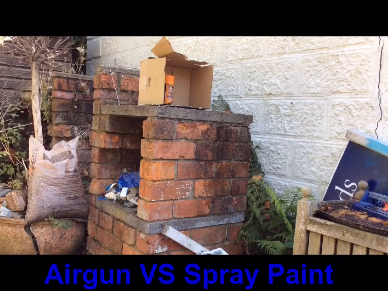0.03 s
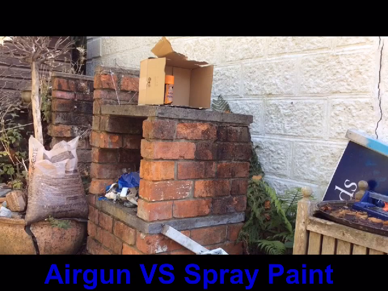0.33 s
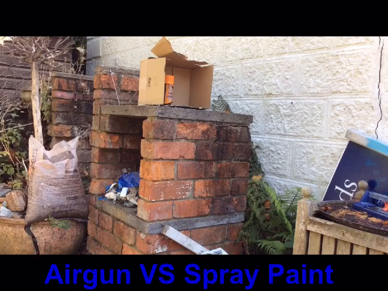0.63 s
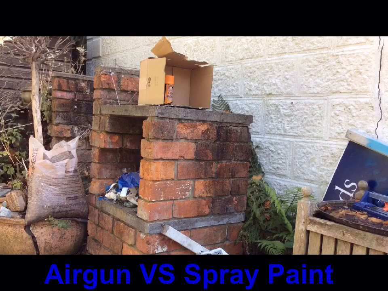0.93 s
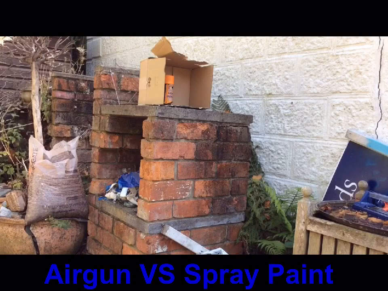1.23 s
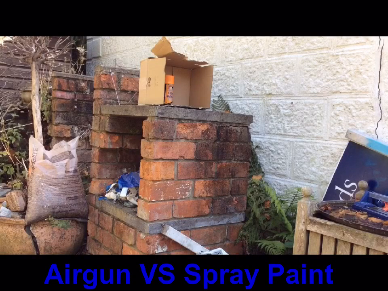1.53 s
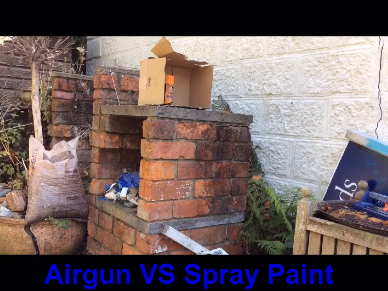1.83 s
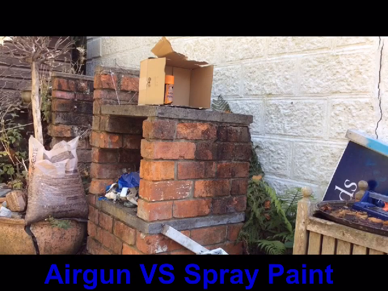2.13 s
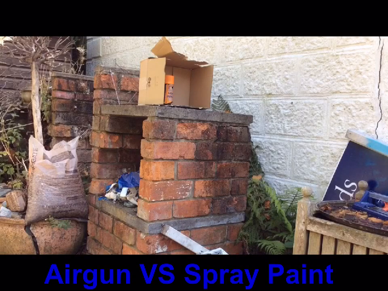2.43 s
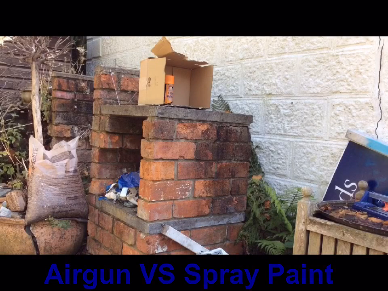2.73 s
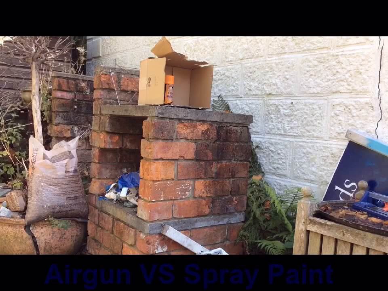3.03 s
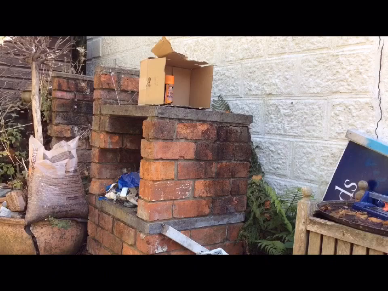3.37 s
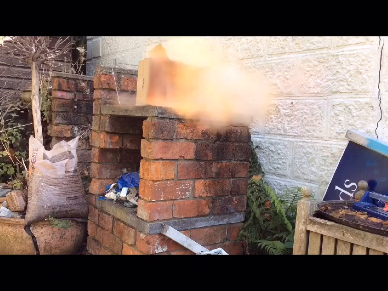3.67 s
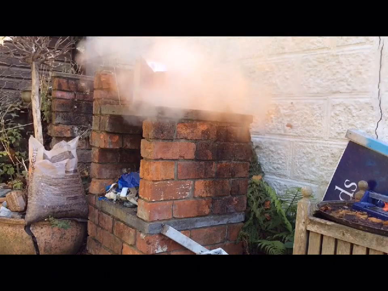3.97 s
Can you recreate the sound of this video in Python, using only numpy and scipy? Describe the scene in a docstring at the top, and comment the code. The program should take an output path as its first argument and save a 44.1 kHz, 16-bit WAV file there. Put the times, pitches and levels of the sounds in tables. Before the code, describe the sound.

A spray can explodes in a quiet yard. Faint distant traffic and a few soft bumps come first, then a sudden, very loud crack, a hissing rush of gas and a fiery roar, with a short echo off nearby walls.

```python
"""Distant traffic fades in a quiet yard, with a few soft bumps. Near the end a spray can ruptures inside
a cardboard box on a brick barbecue. The shell tears and cracks three times, the propellant rushes out
and catches fire, the torn steel rings and the hollow of the box booms under the fireball.
Brick walls close by answer with a short tail."""
import sys
import numpy as np
from scipy import signal
from scipy.fft import rfft, irfft, next_fast_len
from scipy.io import wavfile
from scipy.ndimage import map_coordinates

SR = 44100
rng = np.random.default_rng(int(sys.argv[2]) if len(sys.argv) > 2 else 0)


def generate_wav(sig):
    """Save sig (samples, or channels by samples) to the path in sys.argv[1] as 16-bit PCM at SR."""
    pcm = np.round(np.clip(np.atleast_2d(sig).T, -1, 1) * 32767).astype(np.int16)
    wavfile.write(sys.argv[1], SR, pcm)


N = 176400
T = np.arange(N) / SR
TEAR_S, JET_S, FIRE_S = 3.6845, 3.6917, 3.72  # the shell gives, the gas escapes, the cloud ignites


def rupture():
    """The steel shell tears, then cracks three times with a heavy body and a bright edge."""
    # cracks of the bursting shell: t/s, body level/dB, edge level/dB, t60/s
    cracks = [(3.6917, -11, -24, 0.089), (3.704, -14, -23, 0.13), (3.7168, -9.5, -9.5, 0.039)]
    # spectrum of the body: f/Hz, level/dB
    body_colour = [(25, -19), (55, -15), (95, -2), (150, -2), (200, -2.5), (255, -20), (340, -4.5),
                   (500, -1), (680, -6), (900, -4), (1350, 1.5), (1750, -8), (2450, -3.5), (4000, -20)]
    # spectrum of the edge: f/Hz, level/dB
    edge_colour = [(1500, -35), (3500, -12), (8000, 10.5), (12000, 6), (15500, 8)]
    tear = strike(TEAR_S, rise=0.0011, t60=0.2)
    body, edge = amp(-25) * tear, amp(-28.5) * tear
    for start, body_db, edge_db, t60 in cracks:
        blow = strike(start, rise=0.00027, t60=t60)
        body = np.hypot(body, amp(body_db) * blow)  # the blows add in power
        edge = np.hypot(edge, amp(edge_db) * blow)
    return body * noise(body_colour) + edge * noise(edge_colour)


def jet():
    """Propellant rushes out with a sputter of droplets, brightens as the spray thins, and runs dry."""
    # contour of the outflow: t/s, relative level/dB
    outflow = [(3.692, -20.5), (3.716, -20.5), (3.742, -14.5), (3.765, -14.5), (3.788, -13.5),
               (3.815, -14.5), (3.835, -19.5), (3.865, -19.5), (3.895, -24), (3.94, -25.5), (3.965, -35),
               (4.0, -52)]
    # spectrum while liquid still sprays: f/Hz, level/dB
    spray_colour = [(1500, -2.5), (2400, 1), (3400, -4.5), (4400, -0.5), (6000, -3), (8000, 0), (11000, -7),
                    (13500, -8), (15500, -17)]
    # spectrum of gas alone: f/Hz, level/dB
    gas_colour = [(1500, -9), (2100, -10), (3000, 1), (4000, -2.5), (4900, -0.5), (6100, -3), (7500, 2),
                  (9500, -1), (12000, -2.5), (15500, -13.5)]
    thins_s, crossfade_s = 3.775, 0.0049
    gas_share = (1 + np.tanh((T - thins_s) / crossfade_s)) / 2
    rush = np.sqrt(1 - gas_share) * noise(spray_colour) + np.sqrt(gas_share) * noise(gas_colour)
    sputter = amp(-8) * unit(noise(gas_colour) * amp(5.5 * wobble(rate=1200)))
    level_db = curve(outflow) - 0.71 + 1.2 * wobble(rate=250)
    return (rush + sputter) * ramp(JET_S, length=0.0018) * amp(level_db)


def fireball():
    """The cloud ignites: a fluttering roar that settles to a steady burn, flares and a low flame."""
    # spectrum of the roar: f/Hz, level/dB
    roar_colour = [(200, -14), (450, 3.5), (580, -9.5), (820, 2.5), (1000, -1.5), (1450, -0.5),
                   (1700, -4.5), (2500, -5.5), (4000, -15)]
    # flares within the fireball: t/s, level/dB, f/Hz, width/Hz
    flare_ups = [(3.756, -20, 420, 500), (3.765, -13, 1170, 300), (3.856, -22, 1500, 110)]
    # spectrum of the low flame: f/Hz, level/dB
    flame_colour = [(25, -42), (70, 1), (110, -12), (190, -9.5), (300, -20)]
    attack_s = 0.0036
    flash = amp(-25.5) * strike(FIRE_S, rise=attack_s, t60=1.39)
    swell = amp(-34.5) * ramp(3.94, length=0.019)  # the flame spreads as the jet runs dry
    roar = noise(roar_colour) * np.hypot(flash, swell) * amp(2 * wobble(rate=130))
    flares = sum(amp(db) * strike(start, rise=0.0019, t60=0.058) * resonating([(hz, width, 0)])
                 for start, db, hz, width in flare_ups)
    flame = amp(-46.5) * noise(flame_colour) * ramp(FIRE_S, length=attack_s)
    return roar + flares + flame


def ringing():
    """The rush of gas booms in the hollow around the can and rings the torn steel."""
    # air modes of the box and hearth: f/Hz, width/Hz, relative level/dB
    hollow_modes = [(314, 16.8, 1.5), (345.4, 26.3, 0), (384, 41, -4), (430, 51, -8.5)]
    # modes of the torn shell: f/Hz, width/Hz, relative level/dB
    steel_modes = [(2008, 17, -3), (2408, 24, 0.5), (3340, 41, 0.5), (3460, 42, -6), (4210, 37, -1),
                   (4320, 29, -4), (5380, 30, -6)]
    hollow = amp(-20) * strike(FIRE_S, rise=0.0056, t60=0.79) * resonating(hollow_modes)
    steel = amp(-26) * strike(FIRE_S, rise=0.0049, t60=0.88) * resonating(steel_modes)
    return hollow + steel


def whistle():
    """Gas whistles briefly through the tear."""
    pitch_hz, width_hz = 4330, 95
    progress = ramp(3.737, length=0.03)
    arch = 2 * np.sqrt(progress * (1 - progress))
    return amp(-19) * arch * resonating([(pitch_hz, width_hz, 0)])


def brief_dip():
    """A gain that ducks the burst for an instant before the last crack."""
    start_s, length_s, depth_db = 3.7116, 0.0055, -11
    release = np.clip((start_s + length_s - T) / 0.0003, 0, 1)
    return amp(depth_db * ramp(start_s, length=0.0006) * release)


def yard(x):
    """The close brick walls add a short diffuse tail."""
    tail = rng.standard_normal(N) * strike(0, rise=0.012, t60=0.5)
    return x + amp(-25) * signal.fftconvolve(x, tail / np.linalg.norm(tail))[:N]


def bumps():
    """Soft, dull thuds close by, each a low tone that dies within a few cycles."""
    # thuds: t/s, level/dB, f/Hz
    thuds = [(1.157, -50, 80), (1.225, -51, 85), (2, -48, 77), (2.041, -49.5, 80), (2.239, -37, 88),
             (2.275, -49, 75), (2.489, -68, 55), (3.009, -51, 60.4), (3.279, -46.5, 84)]
    return sum(amp(db) * strike(start, rise=0.0018, t60=0.063) * np.sin(2 * np.pi * hz * (T - start))
               for start, db, hz in thuds)


def traffic():
    """A distant wash of road noise whose treble fades faster as it recedes."""
    # contour of the traffic: t/s, relative level/dB
    contour = [(0, -62), (.9, -64.5), (1.6, -66), (2.4, -70.5), (3.65, -67.5)]
    # spectrum of the road noise: f/Hz, level/dB
    road_colour = [(90, -7), (150, -1), (280, -3.5), (430, -9.5), (780, -9.5), (1060, -2.5), (1220, -6.5),
                   (1480, -4.5), (1820, -12.5), (2020, -9), (2300, -14), (3400, -21.5), (7000, -35)]
    crossover_hz, treble_db_per_s = 1770, -3
    road = noise(road_colour)
    lows = filtered(road, lambda hz: 1 / (1 + (hz / crossover_hz) ** 8))
    treble = (road - lows) * amp(treble_db_per_s * T)
    return (lows + treble) * amp(curve(contour) + 1 + 0.35 * wobble(rate=7.58))


def outdoor_bed():
    """A low, wavering rumble that slowly sinks, under a faint steady hiss."""
    # spectrum of the rumble: f/Hz, level/dB
    rumble_colour = [(12, -55), (20, -26), (64, 1), (139, -8), (244, -17.5), (269, -19), (350, -14.5),
                     (460, -44), (770, -120)]
    # spectrum of the hiss: f/Hz, level/dB
    hiss_colour = [(300, 8), (2000, 0), (4000, 0), (7400, -5.5), (8500, -2.5), (11500, -5), (15000, -13)]
    rumble_db_per_s = -1
    rumble = noise(rumble_colour) * amp(-67 + rumble_db_per_s * T + 1.2 * wobble(rate=21))
    return rumble + amp(-72) * noise(hiss_colour)


def amp(db):
    """Decibels to gain."""
    return 10 ** (np.asarray(db) / 20)


def unit(x):
    """x at rms 1."""
    return x / np.sqrt(np.mean(x ** 2) + 1e-20)


def curve(rows):
    """Breakpoints (t/s, value) as one value per sample."""
    return np.interp(T, *np.transpose(rows))


def ramp(start, length):
    """A straight fade from 0 to 1 that then holds; times in seconds."""
    return np.clip((T - start) / length, 0, 1)


def strike(start, rise, t60):
    """An envelope with a fast attack and an exponential decay; times in seconds."""
    t = np.maximum(T - start, 0)
    return (1 - np.exp(-t / rise)) * np.exp(-np.log(1000) * t / t60)


def wobble(rate):
    """A smooth random curve, rate knots a second."""
    return map_coordinates(rng.standard_normal(int(N * rate / SR) + 4), [T * rate])


def filtered(x, response):
    """x through a filter whose gain is response(f/Hz)."""
    size = next_fast_len(N + SR // 2)
    return irfft(rfft(x, size) * response(np.fft.rfftfreq(size, 1 / SR)), size)[:N]


def noise(colour):
    """Noise of rms 1 with a spectral density shape (f/Hz, level/dB) that rolls off beyond its ends."""
    f, db = np.transpose(colour)

    def response(hz):
        roll_off = np.sqrt((1 + (f[0] / 2 / (hz + 1)) ** 4) * (1 + (hz / f[-1] / 2) ** 4))
        return amp(np.interp(np.log(hz + 1), np.log(f), db)) / roll_off
    return unit(filtered(rng.standard_normal(N), response))


def resonating(modes):
    """Turbulence ringing modes (f/Hz, width/Hz, level/dB) of alternating polarity, at rms 1."""
    def response(hz):
        return sum((-1) ** k * amp(db) * 1j * hz * width / (centre ** 2 - hz ** 2 + 1j * hz * width)
                   for k, (centre, width, db) in enumerate(modes))
    return unit(filtered(rng.standard_normal(N), response))


def scene():
    """The burst in the yard over the quiet background, in mono."""
    burst = yard(rupture() + jet() + fireball() + ringing() + whistle()) * brief_dip()
    return (burst + bumps() + traffic() + outdoor_bed())[None]


def record(dry):
    """A soft clip rounds the highest peaks and a steep low-pass trims the very top."""
    ceiling, top_hz = 0.9, 15500
    rounded = dry[0] / (1 + np.abs(dry[0] / ceiling) ** 6) ** (1 / 6)
    return filtered(rounded, lambda hz: (1 - np.tanh((hz - top_hz) / 110)) / 2)[None]


dry = scene()
out = record(dry)
generate_wav(out)
```